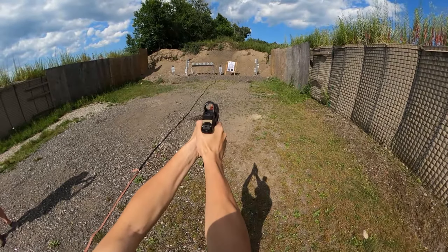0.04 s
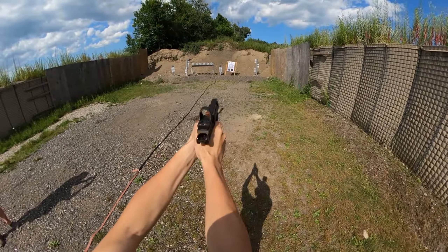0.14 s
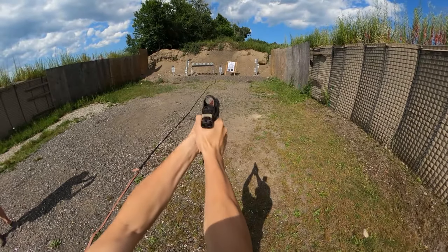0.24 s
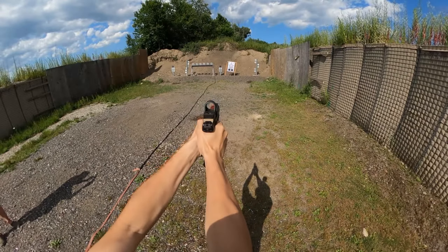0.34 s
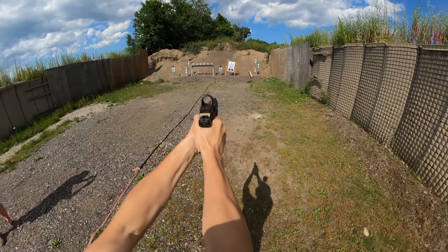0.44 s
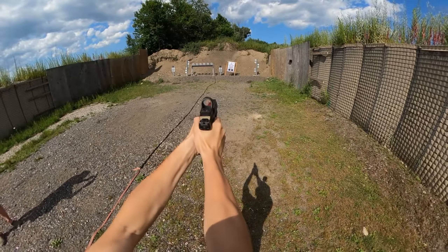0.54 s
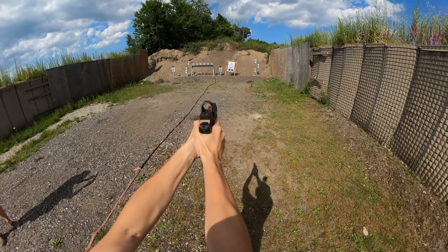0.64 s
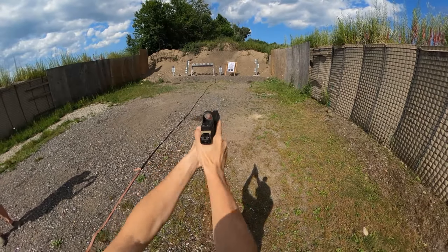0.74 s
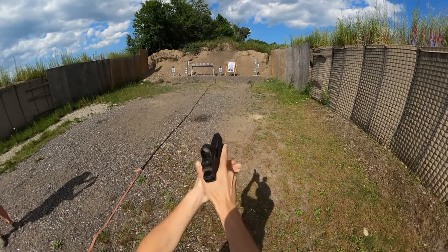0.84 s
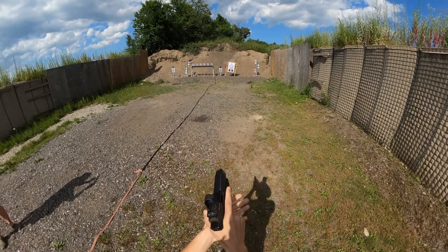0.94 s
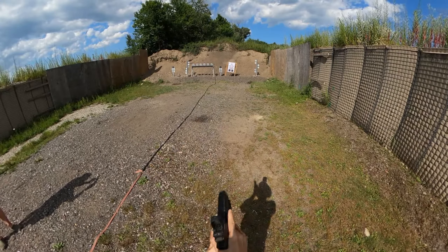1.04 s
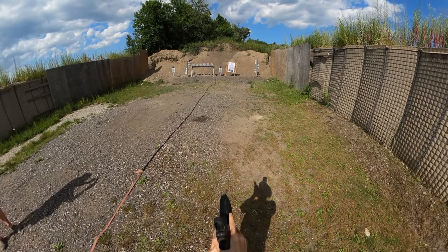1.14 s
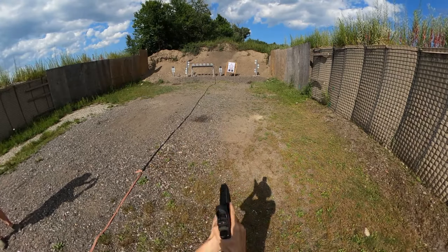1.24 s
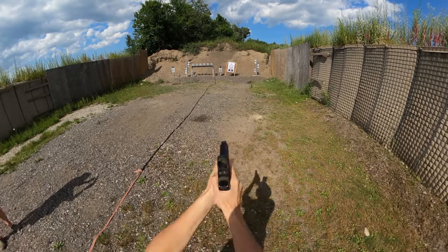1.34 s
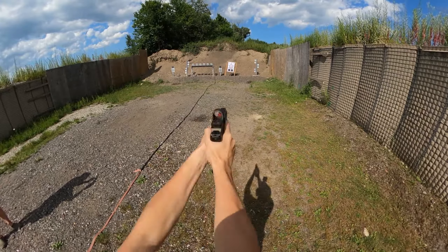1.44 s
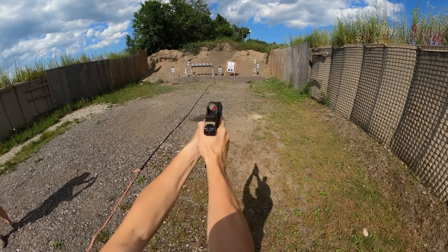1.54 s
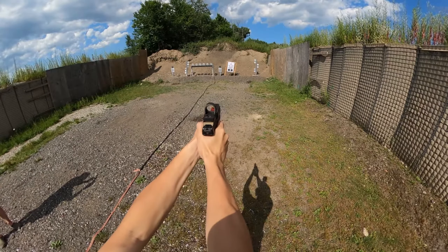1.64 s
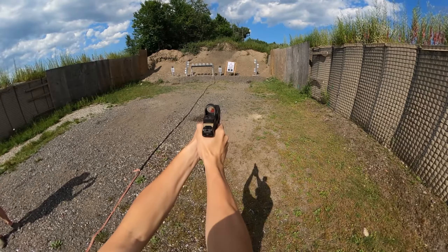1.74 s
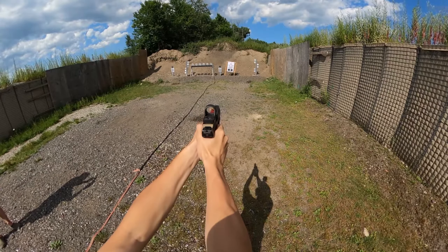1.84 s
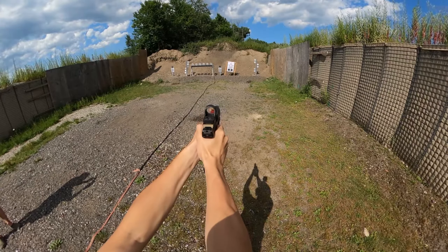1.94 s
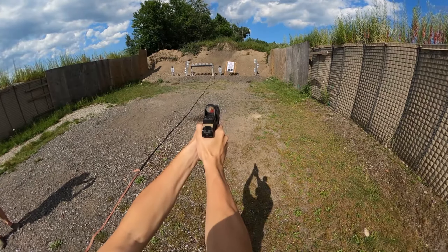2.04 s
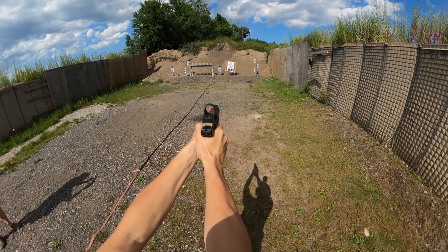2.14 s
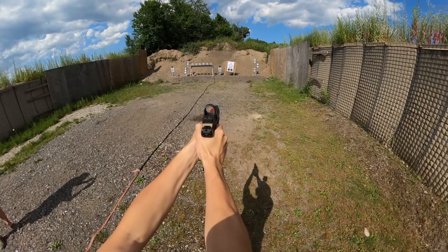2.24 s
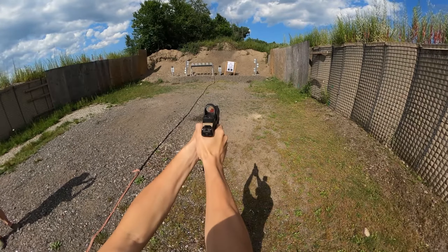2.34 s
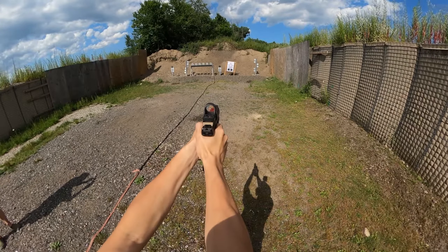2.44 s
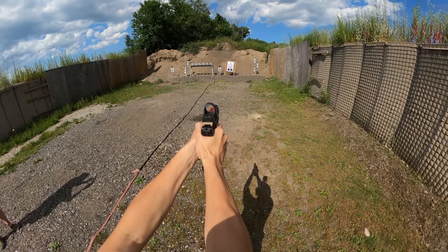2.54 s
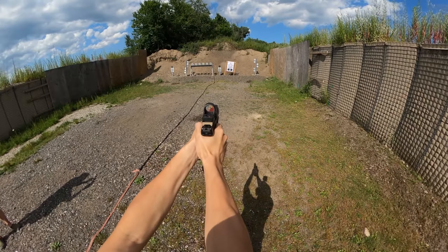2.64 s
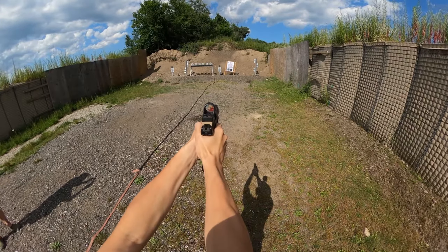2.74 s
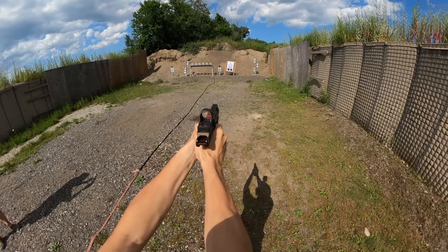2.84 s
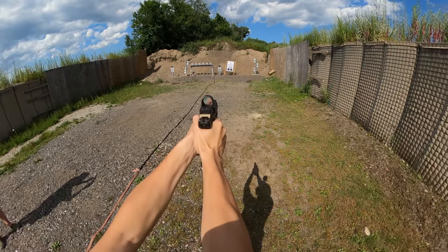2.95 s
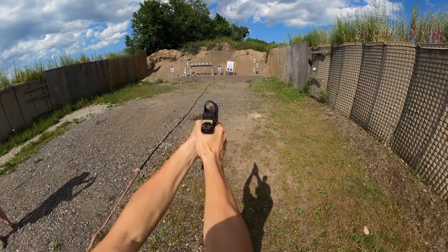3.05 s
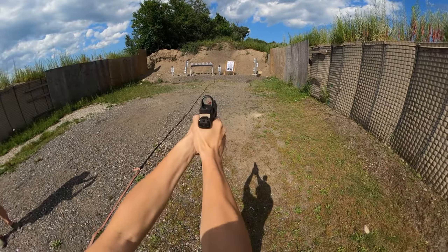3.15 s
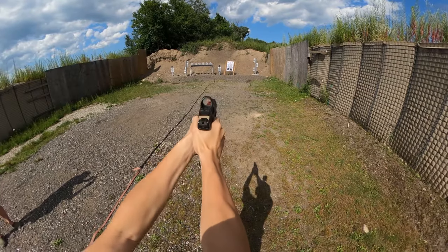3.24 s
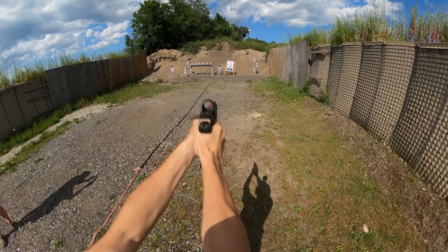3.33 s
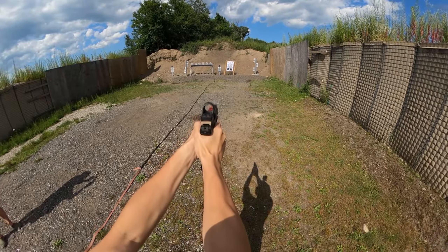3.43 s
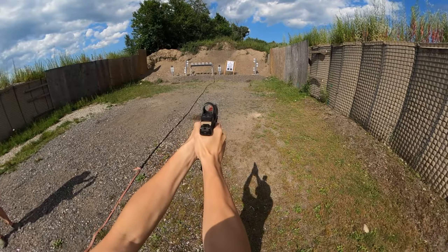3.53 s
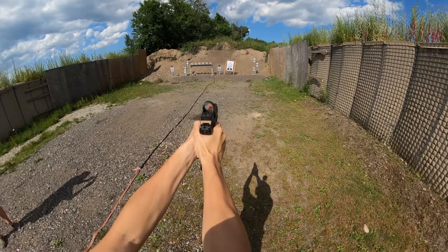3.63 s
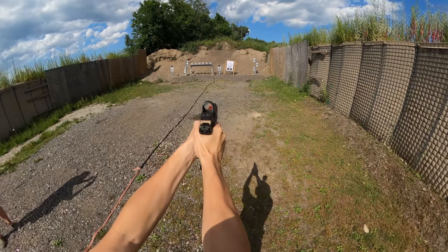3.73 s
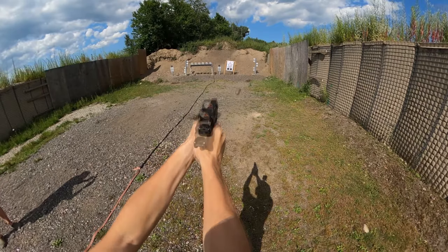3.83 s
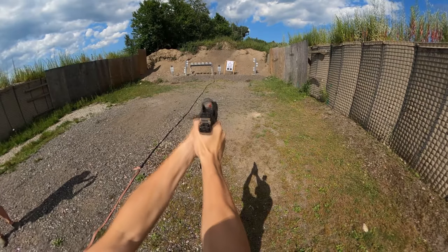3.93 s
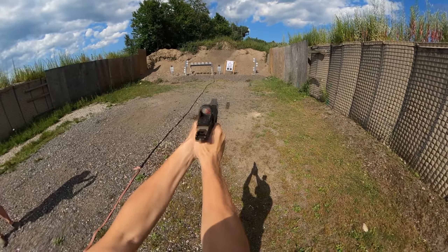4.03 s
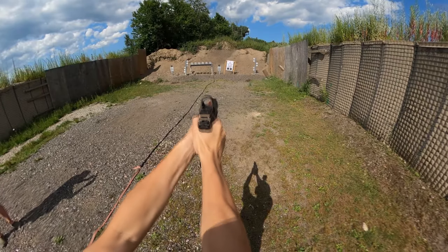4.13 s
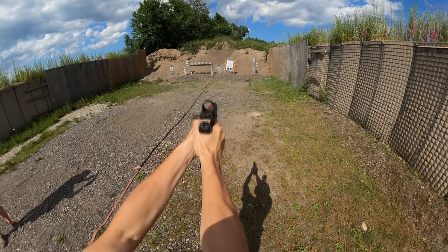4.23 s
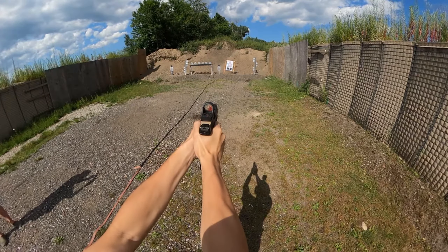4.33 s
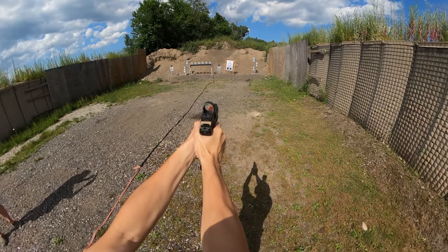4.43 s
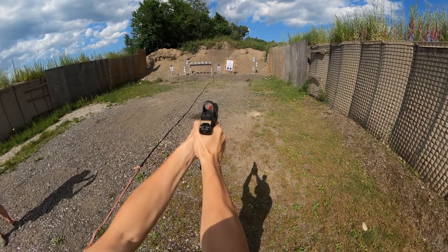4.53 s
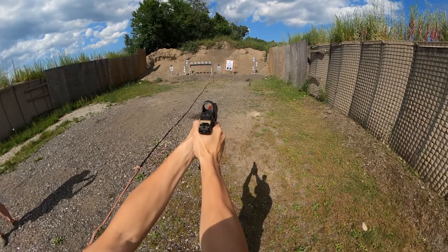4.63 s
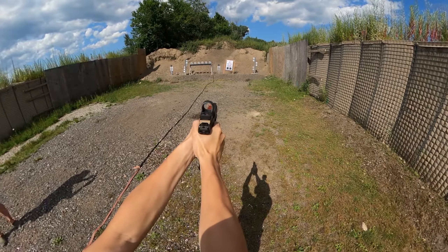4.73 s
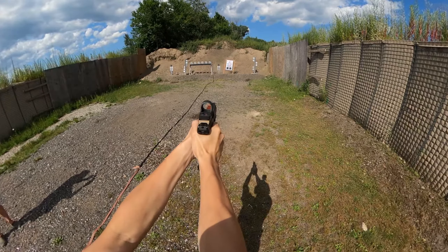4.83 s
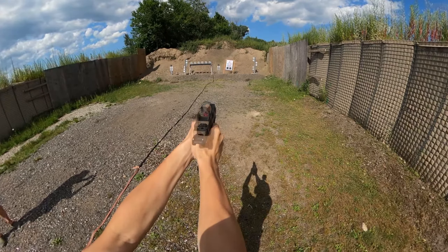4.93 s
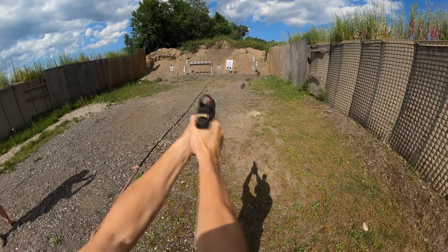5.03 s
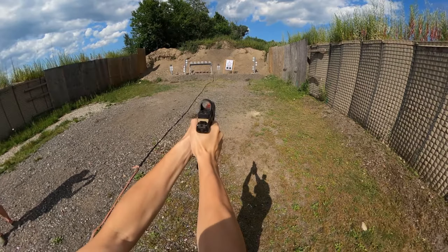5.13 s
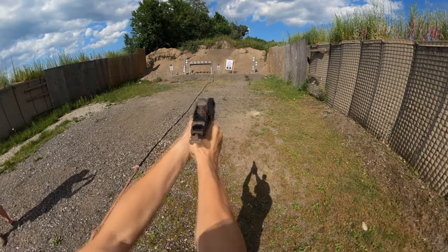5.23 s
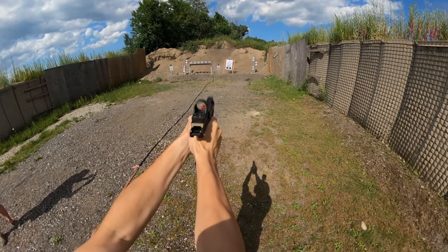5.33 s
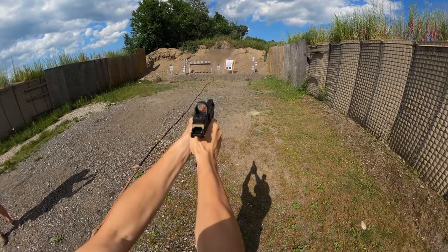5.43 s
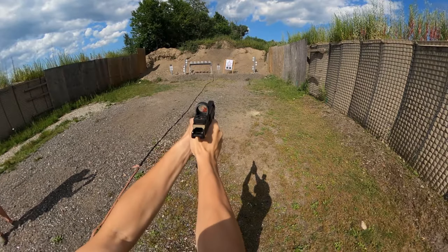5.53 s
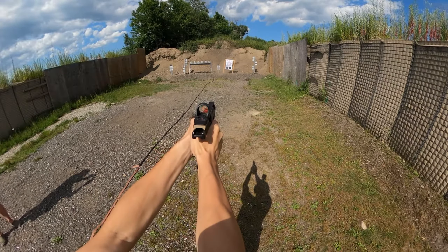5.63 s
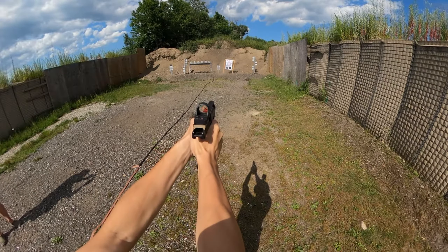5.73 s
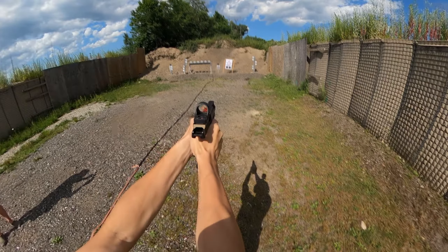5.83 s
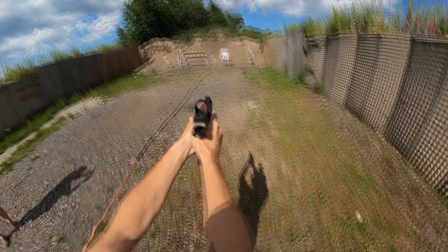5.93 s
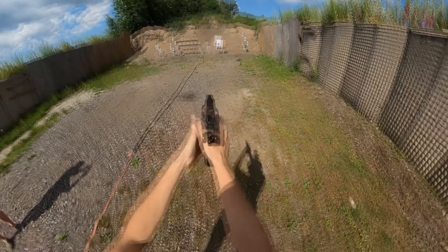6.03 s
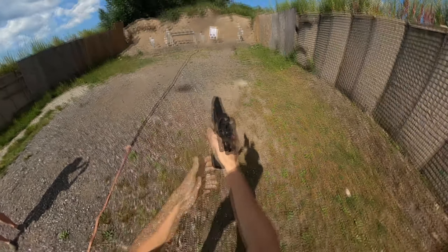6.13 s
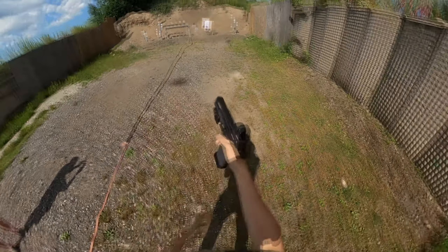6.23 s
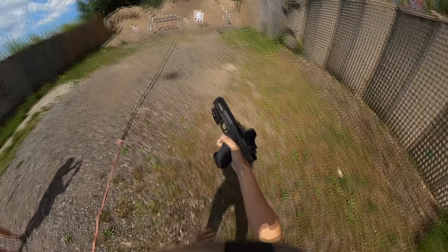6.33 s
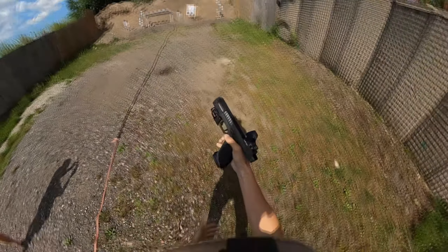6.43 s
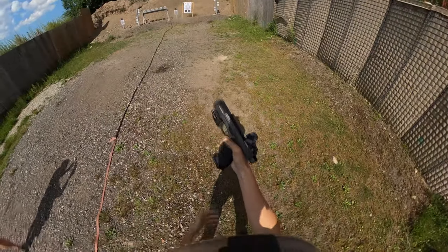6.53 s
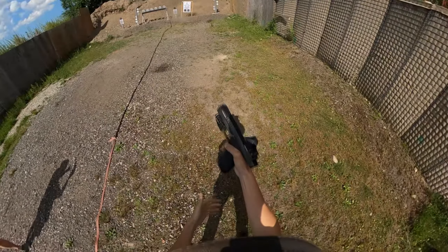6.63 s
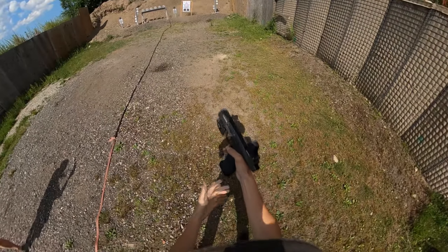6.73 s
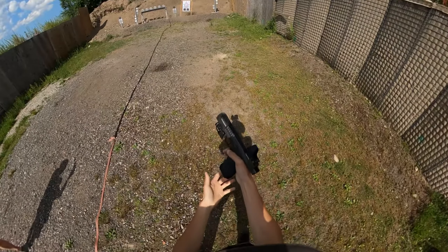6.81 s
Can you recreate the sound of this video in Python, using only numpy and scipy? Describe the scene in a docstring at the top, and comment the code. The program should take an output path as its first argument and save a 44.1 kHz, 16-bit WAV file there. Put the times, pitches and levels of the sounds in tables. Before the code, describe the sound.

A body-worn microphone overloads on four fast pairs of pistol blasts in a walled, open-air bay. Each shot is a hard, clipped crack with a short housing ring, rapid slaps from ground, walls and earth bank, and a low boom and decaying roll. Between pairs there are low wind rumble, rustling gusts, thin hiss and dull distant thuds; other guns crack nearby around the second pair.

```python
"""Outdoors, light wind rumbles, rustles and hisses throughout, built from shaped noise.
Short growing knocks lead into the first of four quick pairs of handgun shots; each blast is a set of pressure
pulses that overload a chest camera and ring its housing, then slap back from ground, side walls and earth bank
and roll away as decaying noise over low air modes. From the first second on dull thuds come from far off, and
around the second pair sharp cracks and their wall slaps come from the next bays; gusts and thuds carry on."""
import sys
import numpy as np
from scipy import signal
from scipy.fft import rfft, irfft
from scipy.io import wavfile
from scipy.ndimage import uniform_filter1d

SR = 44100
rng = np.random.default_rng(int(sys.argv[2]) if len(sys.argv) > 2 else 0)


def dump_mix(stems):
    """Bounce the given channels to the path in sys.argv[1] as a 16-bit WAV at rate SR."""
    frames = np.atleast_2d(stems).T  # one column per channel
    limited = np.clip(frames, -1, 1)  # hard clip at full scale
    pcm = np.round(limited * 32767).astype(np.int16)
    wavfile.write(sys.argv[1], SR, pcm)


N = 303088
T = np.arange(SR) / SR  # one second of time, the length of one shot's sound
LEAD = 100  # samples of room ahead of a blast

# handgun shots: (t/s, blast level/dB, wall slap level/dB, bank slap level/dB, roll level/dB, boom level/dB)
SHOT_TABLE = [(0.1814, -3, -20, -21.5, -34, -12.5), (.4180, -3.5, -21.5, -23.5, -40, -14),
              (2.9009, -2, -26, -26.5, -40, -12.5), (3.1211, -4, -30.5, -24, -40, -15),
              (3.8610, -4, -31, -34, -41.5, -16.5), (4.0759, -4.5, -31.5, -32, -43.5, -16.5),
              (5.0056, -3, -32.5, -29, -41, -16.5), (5.2414, -4, -32, -29, -42.5, -23)]
# surfaces that answer each shot: (delay/s, level relative to its zone/dB, spread t60/s, centre f/Hz)
ECHO_TABLE = [(.002, -30, 0.033, 2510), (.0075, -20, 0.012, 1230), (.0085, -33, 0.075, 4000),
              (.0168, -17, 0.013, 780), (0.0166, -33.5, 0.048, 3500), (.026, -35, 0.045, 1500),
              (.0515, -19, .02, 5500), (.0545, 4.5, 0.011, 968), (.0555, -13, 0.0085, 3457),
              (.066, -18, .015, 1186), (0.0734, 0, 0.011, 1144), (0.0762, -12, .02, 2665),
              (.078, -6, 0.0046, 6674), (0.092, -18.5, 0.00735, 1170), (.103, -18.5, 0.0042, 1490),
              (.104, -22, 0.0077, 4500), (0.134, 1, 0.05, 1250), (.16, -2.5, 0.039, 1107),
              (0.201, -12.5, .03, 700), (0.302, -15, 0.042, 1240), (.355, -30, 0.06, 1340),
              (.372, -20, 0.022, 1440), (0.414, -23.5, 0.099, 467)]


def amp(db):
    """Decibels to gain."""
    return 10 ** (np.asarray(db) / 20)


def evened(x):
    """Scaled to rms 1."""
    return x / np.sqrt(np.mean(x ** 2) + 1e-20)


def read(points, hz):
    """A table read on a log-frequency axis."""
    f, value = np.transpose(points)
    return np.interp(np.log(hz + 1), np.log(f + 1), value)


def add(mix, s, sound):
    """Mixes a sound in at time s."""
    part = mix[round(s * SR):][:len(sound)]
    part += sound[:len(part)]


def band(x, hz, width=0.7):
    """A broad causal band around hz, width in octaves each side."""
    edges = np.clip([hz / 2 ** width, hz * 2 ** width], 20, SR / 2 - 2000)
    return signal.sosfilt(signal.butter(2, edges, "band", fs=SR, output="sos"), x)


def noise(length, db_of, size):
    """Noise from random short-time spectra, shaped by the level db_of(hz, t)."""
    hz = np.fft.rfftfreq(size, 1 / SR)[:, None]
    t = np.arange(length * 4 // size + 5) * size / 4 / SR
    a, b = rng.standard_normal((len(t), len(hz), 2)).T
    spectra = (a + 1j * b) * amp(db_of(hz, t))
    return signal.istft(spectra, nperseg=size, noverlap=size * 3 // 4)[1][:length]


def wind():
    """Lumpy rumble on the microphone, a mid rustle that comes in gusts, and the hiss of the open range."""
    # noise spectra, only their shape counts: (f/Hz, relative level per Hz/dB)
    rumble_shape = [(12, -29.5), (25, 2), (42, 9), (70, -12), (110, -23.5), (200, -68.5), (400, -110)]
    rustle_shape = [(40, -25.5), (110, 10.5), (200, -0.5), (400, -15), (900, -20.5), (2000, -48.5),
                    (5000, -90.5)]
    hiss_shape = [(180, -27.5), (350, -1), (500, -1), (1000, -6.5), (2000, -10.5), (4000, -18.5),
                  (6500, -24), (8000, -33), (10000, -56), (13000, -80)]
    # rms level of the rumble and of the hiss over time: (t/s, level/dB)
    rumble_level = [(0, -34.5), (.12, -32), (.62, -45), (.8, -58.5), (1.2, -62.5), (1.6, -57), (1.9, -49.5),
                    (2.2, -49.5), (2.6, -55), (2.72, -44.5), (2.9, -45.5), (3.55, -61), (3.75, -58),
                    (4.9, -59), (5.55, -51.5), (6.25, -61), (6.55, -50), (6.87, -41)]
    hiss_level = [(0, -84), (2.5, -81), (3.5, -74), (4.5, -77), (6.4, -77), (6.87, -81.5)]
    # bell-shaped rustling gusts: (centre t/s, half length/s, level/dB)
    gust_table = [(0.139, 0.086, -61), (0.801, .2, -69), (1.45, 0.18, -71), (2.196, 0.34, -74),
                  (2.845, .1, -56), (3.747, 0.24, -69.5), (5.938, 0.36, -61), (6.398, 0.11, -58),
                  (6.73, 0.13, -61)]

    t = np.arange(N) / SR
    gusts = amp(-72)  # the rustle between gusts
    for s, half, db in gust_table:
        gusts = gusts + amp(db) * np.exp(-2 * ((t - s) / half) ** 2)
    layers = [(rumble_shape, amp(np.interp(t, *np.transpose(rumble_level))), 1.5),
              (rustle_shape, gusts, 2),
              (hiss_shape, amp(np.interp(t, *np.transpose(hiss_level))), .6)]
    out = np.zeros(N)
    for shape, level, lumpy_db in layers:
        lumps = uniform_filter1d(rng.standard_normal(N), size=1800)
        lumps = evened(uniform_filter1d(lumps, size=1200))
        layer = noise(N, lambda hz, t: read(shape, hz) + 0 * t, size=2048) * amp(lumpy_db * lumps)
        out += evened(layer) * level
    return out


def crack(hz, t60, grain):
    """A blast thrown back by a rough surface: one knock around hz, then a short burst of grains."""
    t = T[:len(grain)]
    # the knock rises in half a cycle and dies in ten
    knock = np.sin(2 * np.pi * hz * t) * amp(-60 * t * hz / 10) * np.minimum(2 * t * hz, 1)
    burst = evened(band(grain, hz)) * amp(-60 * t / np.clip(t60, .003, 1) - 3.5)
    return 2.2 * knock + burst * np.minimum(t / 0.00013, 1)


def roll(swell):
    """The diffuse tail of one shot: noise whose bands each die at their own speed."""
    # starting spectrum of the tail, only its shape counts: (f/Hz, relative level per Hz/dB)
    roll_shape = [(20, -23), (60, 4.5), (140, -4), (200, -9), (600, -10), (1150, -13), (1900, -19.5),
                  (2200, -26.5), (5300, -34), (9000, -45.5), (12000, -77.5), (16000, -81.5)]
    # decay time of the tail before the swell: (f/Hz, t60/s)
    roll_t60 = [(40, 0.061), (150, 0.48), (400, 0.42), (1200, 0.54), (3500, 0.46), (7000, 0.36),
                (12000, .2)]

    # smooth random patches of louder and softer sound over frequency and time
    patches = uniform_filter1d(rng.standard_normal((257, SR // 128 + 5)), 9, 0)
    patches = evened(uniform_filter1d(patches, 4, 1))

    def level_db(hz, t):
        return read(roll_shape, hz) - 60 * t / read(roll_t60, hz) + 2.0 * patches[:, :len(t)]

    tail = noise(SR, level_db, size=512)
    # many small surfaces answer one by one
    flutter_db = 2.2 * evened(uniform_filter1d(rng.standard_normal(SR), 200))
    tail = tail * amp(np.interp(T, *np.transpose(swell)) + flutter_db) * np.minimum(T / 0.0014, 1)
    return tail / np.sqrt(np.mean(tail[SR // 20:SR // 5] ** 2))  # rms 1 from 50 to 200 ms


def far_guns():
    """Cracks and slaps from behind the walls, each with a low push and a roll, and thuds from far down the range."""
    # sharp cracks from guns in the next bays and their wall slaps: (t/s, body level/dB, centre f/Hz,
    # bright snap level/dB, roll level/dB, low push level/dB)
    neighbour_table = [(2.6922, -36.5, 520, -36, -59, -36), (2.7108, -39.5, 480, -36.5, -57, -26),
                       (2.769, -50, 447, -42, -64, -46), (3.1963, -15.5, 1180, -25, -53.5, -10)]
    # dull far thuds: (t/s, level/dB)
    thud_table = [(.98, -62), (1.39, -61.5), (1.474, -60), (1.519, -59.5), (1.843, -56), (2.025, -67),
                  (3.701, -55), (4.701, -54), (5.826, -55), (5.949, -55), (6.008, -60), (6.743, -66)]
    snap_ratio, spread_t60 = 2.67, 0.013  # snap centre over body centre; s

    out = np.zeros(N)
    for s, db, hz, snap_db, roll_db, push_db in neighbour_table:
        body_grain, snap_grain = rng.standard_normal((2, 3000))
        body = amp(db) * crack(hz, spread_t60, body_grain)
        snap = amp(snap_db) * crack(hz * snap_ratio, spread_t60, snap_grain)
        add(out, s, body + snap)
        tail = roll([(0, -13), (.06, -3), (.2, 2), (1, 4)])
        deep = amp(2.5 + 13 * T) * band(tail, 50, 0.43)  # the bass lingers
        add(out, s, amp(roll_db) * (band(tail, 1300, 1.8) + deep))
        add(out, s, -amp(push_db - 60 * T / 0.084) * np.sin(2 * np.pi * 45 * T))
    for s, db in thud_table:
        add(out, s, amp(db) * crack(316, 0.15, rng.standard_normal(6000)))
    return out


def lead_in(count=3):
    """Short growing knocks just ahead of the first shot, each with a dull body and a thin top."""
    gap_s, last_db, step_db = .0108, -14.5, -11  # even spacing; the last knock; change per knock back in time
    out = np.zeros(N)
    for k in range(count):  # backwards from the shot
        mid, body, top = rng.standard_normal((3, 3000))
        knock = crack(980, 0.016, mid)
        knock = knock + amp(-3) * crack(370, 0.06, body)
        knock = knock + amp(-16) * crack(6500, 0.0069, top)
        add(out, SHOT_TABLE[0][0] - (k + 1) * gap_s, amp(last_db + k * step_db) * band(knock, 1500, 2.8))
    return out


def boom():
    """Low air modes of the bay: slow pressure swings between the walls, each starting as a suction."""
    # (start after the shot/s, f/Hz, relative level/dB, t60/s)
    mode_table = [(0.013, 24, 1, .2), (.05, 30, 4, 0.33), (0.016, 44, -0.5, 0.27), (0.14, 99, -11.5, 0.063),
                  (.072, 190, -11, 0.14), (0.078, 118, -12, 0.33), (0.035, 80, -14.5, 0.23)]
    spread_db = 2.0  # modes differ from shot to shot

    out = np.zeros(SR)
    for s, hz, db, t60 in mode_table:
        level = amp(db + spread_db * rng.standard_normal() - 60 * T / t60)
        add(out, s, -level * np.sin(2 * np.pi * hz * T) * np.minimum(T / 0.0072, 1))
    return out


def cracks(zone_db, grains):
    """All the echoes of one shot: each surface keeps its grain and gains a little fresh scatter."""
    out = np.zeros(SR)
    for (delay, db, t60, hz), level_db, grain in zip(ECHO_TABLE, zone_db, grains):
        scattered = grain + 0.2 * rng.standard_normal(3000)
        add(out, delay, amp(level_db + db) * crack(hz, t60, scattered))
    return out


def blast():
    """Pressure peaks flanked by suction, direct and reflected close by, and the ringing of the housing."""
    # modes rung near the microphone: (f/Hz, relative level/dB, t60/s)
    ring_table = [(160, -19.5, 0.073), (233.4, -5, 0.024), (384, -19.5, 0.07), (753, -5, 0.0092),
                  (1217, 3, 0.0076), (1705, -12.5, 0.019), (2192, -10, 0.0096), (3207, -12, .01),
                  (5120, -11.5, 0.0064), (7064, -17.5, 0.0092)]
    # pressure pulses and near reflections: (delay/s, relative level/dB, pulse length/s)
    pulse_table = [(0, -13.5, 0.0002), (.00135, 0.5, 0.0005), (.0084, -3.5, 0.00033),
                   (0.0142, -18.5, 0.00068), (0.02, -12, 0.00054)]
    spread_db = 2.2  # modes differ from shot to shot
    blunt = 0.003  # s of rounding per s of delay

    late = np.maximum(T - .0004, 0)
    out = np.zeros(SR)
    for hz, db, t60 in ring_table:
        level = amp(db + spread_db * rng.standard_normal() - 60 * T / t60)
        # high modes are kicked to full swing at once, low ones start from rest a moment later
        swing = np.cos(2 * np.pi * hz * T) if hz > 500 else np.sin(2 * np.pi * hz * late)
        out += level * swing
    out = np.roll(out * np.minimum(T / .0001, 1), LEAD)
    for s, db, length in pulse_table:
        u = np.hypot(T[:400] - 4 * length, s * blunt) / length  # later ones arrive blunter
        add(out, s + LEAD / SR - 4 * length, amp(db) * (1 - u) * np.exp(-u))
    return out


def shots():
    """The same bay answers every shot, brighter when its slaps are louder; ringing and scatter vary."""
    # the roll is low until the walls answer, builds, holds and lingers: (t after the shot/s, relative level/dB)
    swell = [(0, -10.5), (.048, -19), (.08, -5), (.35, -4), (.7, 8), (1, -0.5)]
    # delays where the walls, the bank and the far surfaces begin: (delay/s)
    zone_starts = [.04, .07, .12]
    far_db = -41  # level of the far surfaces
    # top of the echoes: Hz at a mean slap of dull_db, and its rise per dB of slap
    dull_db, dull_top_hz, top_hz_per_db = -32, 6400, 220
    # treble tilt in dB per octave above 2 kHz, rising per dB of slap above the knee
    tilt_knee_db, dull_tilt_db, tilt_per_db = -27, -1.52, 1.0664

    out = np.zeros(N)
    grains = rng.standard_normal((len(ECHO_TABLE), 3000))
    zone = np.digitize([row[0] for row in ECHO_TABLE], zone_starts)
    bins = np.fft.rfftfreq(SR, 1 / SR)
    octaves = np.log2(np.maximum(bins, 2000) / 2000)
    for s, blast_db, wall_db, bank_db, roll_db, boom_db in SHOT_TABLE:
        near, low = blast(), boom()
        slap_db = (wall_db + bank_db) / 2
        top_hz = dull_top_hz + top_hz_per_db * (slap_db - dull_db)
        tilt_db = dull_tilt_db + tilt_per_db * max(slap_db - tilt_knee_db, 0)
        tilt = amp(tilt_db * octaves)

        # ground and near wall follow the blast, walls and bank their own slap level
        zone_db = np.array([blast_db, wall_db, bank_db, far_db])[zone]
        echoes = amp(roll_db) * roll(swell) + cracks(zone_db, grains)
        edge = 1 / np.sqrt(1 + (bins / top_hz) ** 24)
        above_top = amp(-24) / (1 + (bins / 11500) ** 10)  # a weak remainder passes the edge
        lift = amp(4 * np.exp(-((bins / top_hz - .8) / 0.13) ** 2))  # just under the top
        echoes = irfft(rfft(echoes) * tilt * (above_top + edge) * lift, SR)
        echoes = echoes * np.clip(np.minimum(T / .001, 10 - 10 * T), 0, 1)  # fades in, and out at the end

        blast_colour = tilt * (0.2 + 1 / (1 + (bins / top_hz) ** 6))
        add(out, s - LEAD / SR, amp(blast_db) * irfft(rfft(near) * blast_colour, SR))
        add(out, s, echoes + amp(boom_db) * low)
    return out


def scene():
    """All sources at the microphone."""
    return (wind() + far_guns() + lead_in() + shots())[None]


def record(dry):
    """Faint input noise; the input overloads on the blasts; then the band limit."""
    dry = signal.lfilter(*signal.butter(2, 24, "high", fs=SR), dry)  # the capsule loses the deepest bass
    hiss = signal.lfilter(*signal.butter(1, 7000, fs=SR), rng.standard_normal(N))
    dry = dry + amp(-101) * hiss
    clipped = dry / (1 + np.abs(dry / .95) ** 4) ** .25  # bends smoothly towards a ceiling of .95
    low_pass = signal.firwin(511, 16300, window=("kaiser", 9), fs=SR)
    return signal.oaconvolve(clipped, low_pass[None], "same")


dry = scene()
out = record(dry)
dump_mix(out)
```